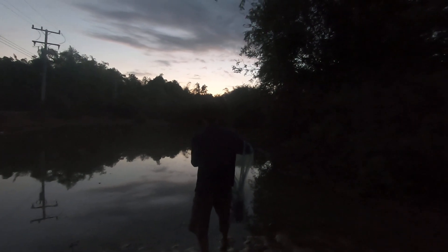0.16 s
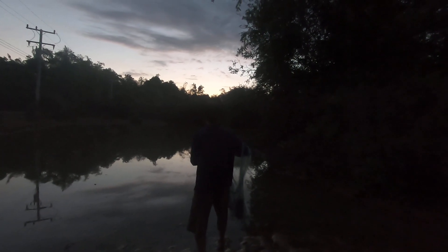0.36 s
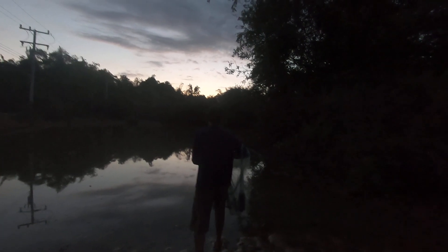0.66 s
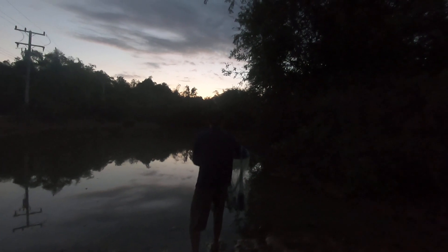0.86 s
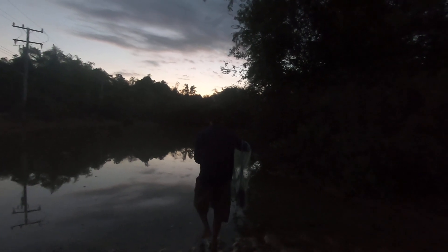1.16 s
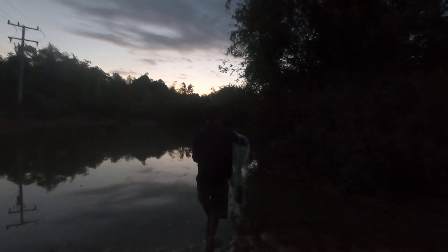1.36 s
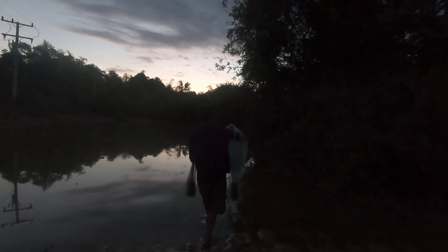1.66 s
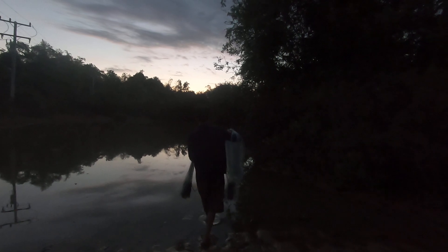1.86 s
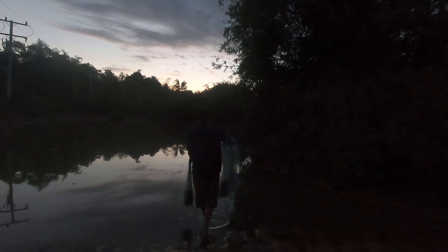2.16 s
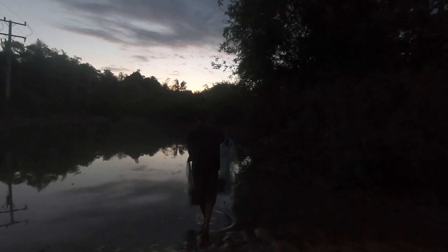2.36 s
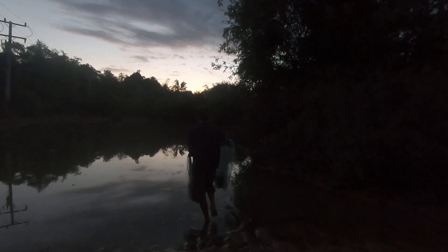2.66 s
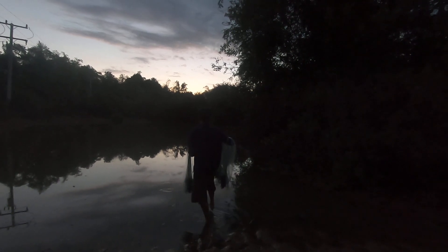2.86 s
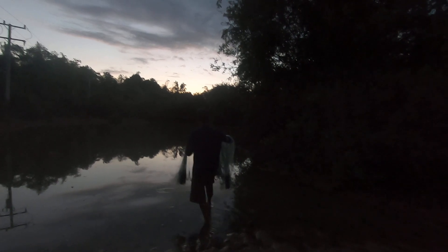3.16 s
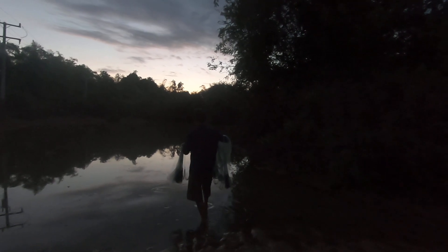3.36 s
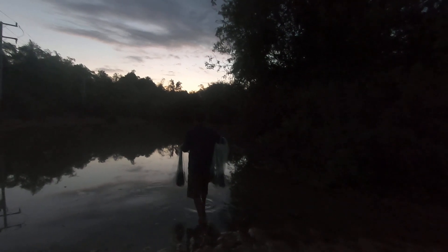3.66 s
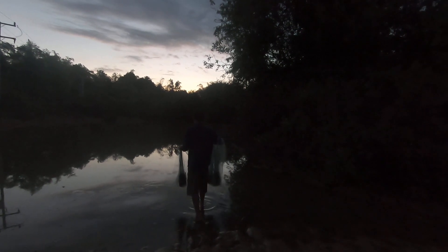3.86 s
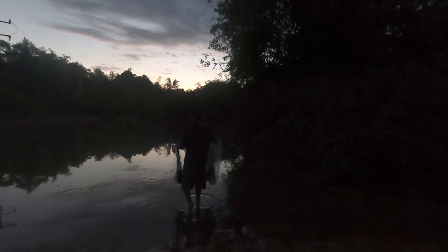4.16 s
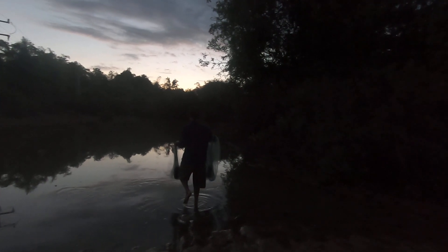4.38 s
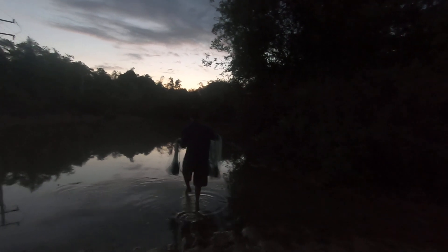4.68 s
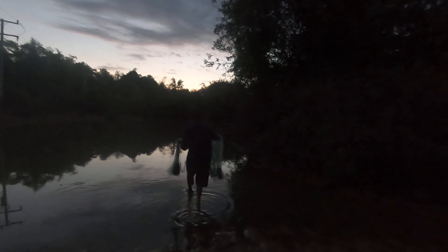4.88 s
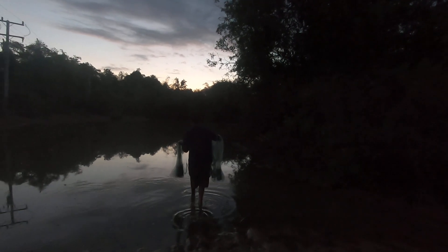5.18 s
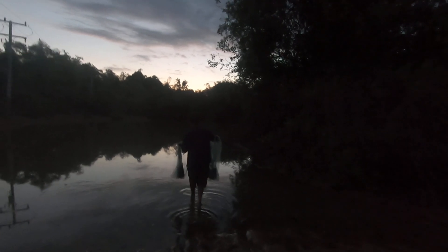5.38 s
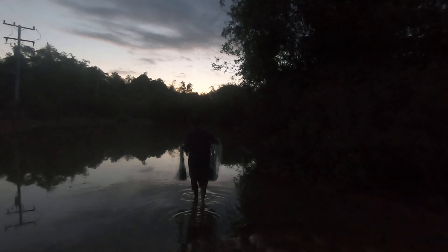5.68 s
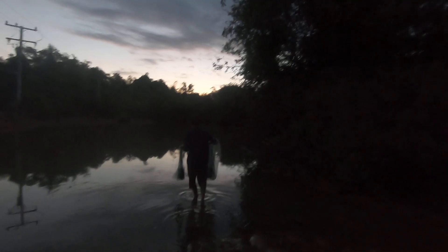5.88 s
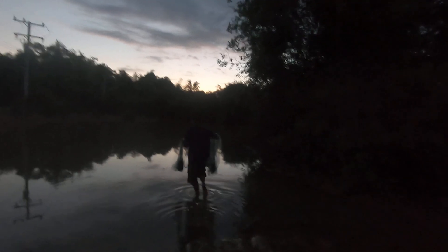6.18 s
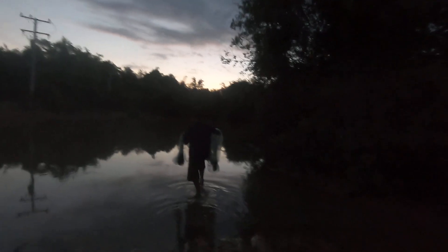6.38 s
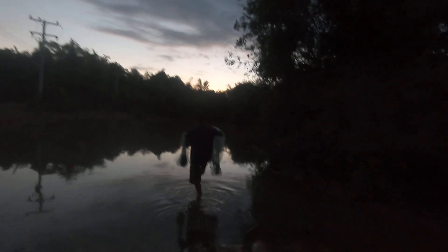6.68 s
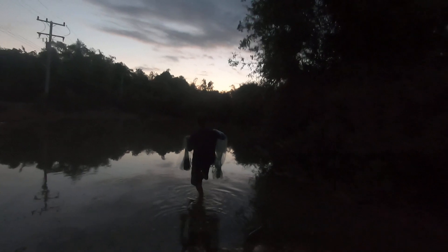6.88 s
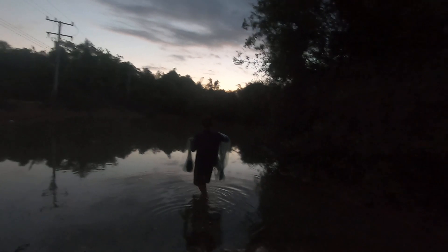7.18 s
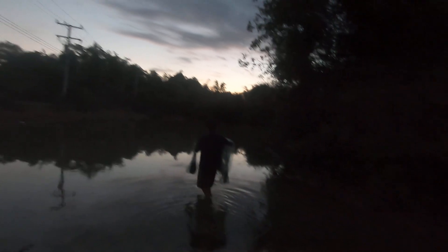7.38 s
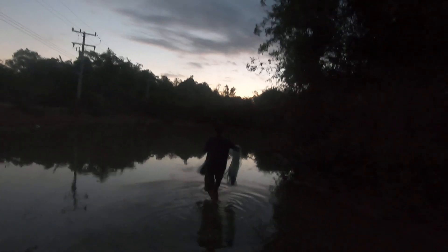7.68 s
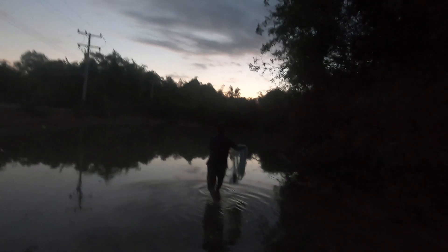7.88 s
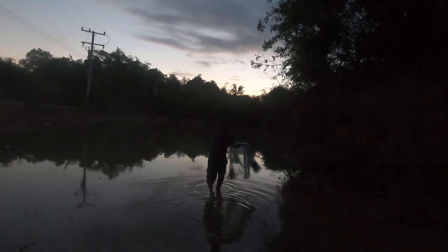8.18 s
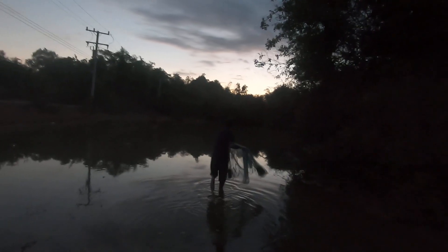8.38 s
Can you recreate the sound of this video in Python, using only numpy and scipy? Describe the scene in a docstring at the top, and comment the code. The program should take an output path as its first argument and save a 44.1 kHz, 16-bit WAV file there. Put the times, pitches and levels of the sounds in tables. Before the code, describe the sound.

Crickets chirp in pulsing triplets over a pond at dusk while someone wades softly, then dull handling knocks and scrapes break in near the end.

```python
"""A pond at dusk: crickets chirp in threes, by stridulation, over a blurred chorus and steady trills.
Wading sloshes and finger scrapes are surges of noise and tiny ringing bubbles; larger bubbles glide
upward in pitch. Drops smack the water, a far bird repeats a note; drone, hiss and air puffs lie beneath.
Fingers on a hand-held camera, mostly late on, excite damped modes of its housing and rub against it."""
import sys
import numpy as np
from scipy import signal
from scipy.fft import rfft, irfft, next_fast_len
from scipy.io import wavfile
from scipy.ndimage import map_coordinates

SR = 44100
rng = np.random.default_rng(int(sys.argv[2]) if len(sys.argv) > 2 else 0)


def wrap_up_sound(samples):
    """Save the sound to the file named by the first command line argument, as 16-bit audio."""
    columns = np.atleast_2d(samples).T
    # keep every value between -1 and 1, then stretch to whole-number steps
    tamed = np.clip(columns, -1, 1)
    steps = np.round(tamed * 32767).astype(np.int16)
    wavfile.write(sys.argv[1], SR, steps)


N = 376594

# Levels are relative: each source's mix gains follow.
# nearest cricket, runs of evenly spaced chirps: (start t/s, chirps)
NEAR_CHIRP_RUNS = [(-.05, 1), (.168, 2), (.647, 2), (1.123, 3), (1.857, 1), (2.075, 3), (2.802, 2),
                   (3.272, 2), (3.741, 1), (3.954, 7), (5.717, 3), (6.452, 3), (7.188, 2), (7.667, 3),
                   (8.399, 1)]
# its rival, runs of evenly spaced chirps: (start t/s, chirps)
RIVAL_CHIRP_RUNS = [(1.956, 3), (2.663, 5), (3.867, 5), (5.154, 3), (5.866, 1), (6.153, 4)]
# a slow, low-pitched cricket, centre of the first syllable of each chirp: (t/s)
SLOW_CHIRP_TIMES = [0.571, 1.26, 2.179, 3.199, 4.352, 4.952, 5.63, 6.599, 7.289, 8.25]
# insect chorus: (t/s, cricket level/dB, bush cricket level/dB)
CHORUS_LEVELS = [(0, -53, -62), (1.1, -51.5, -63), (1.4, -51.5, -65.5), (3.6, -53, -67.5),
                 (5.5, -52, -65.5), (6.7, -53, -64.5), (7.4, -56.5, -63), (8.54, -54.5, -61)]
# tree crickets: (t/s, level/dB)
TRILL_LEVELS = [(0, -70), (1, -70.5), (2, -72), (4.5, -71), (5.8, -71), (6.5, -65.5), (8.54, -67)]
# sloshes of the water and scrapes of fingers on the housing:
# (crest t/s, length t/s, froth and droplet level/dB, spray level/dB)
SLOSHES_AND_SCRAPES = [(0.897, 0.088, -62.5, -74), (2.504, 0.11, -62.5, -71), (3.1, .07, -73, -79),
                       (3.826, 0.047, -66, -85), (4.004, 0.1, -68, -92), (4.297, 0.14, -67, -80),
                       (4.86, .06, -65.5, -94), (6.286, 0.14, -59.5, -69), (6.688, .05, -60, -68),
                       (7.027, 0.06, -52.5, -67), (7.217, 0.019, -55.5, -74), (7.374, 0.012, -44, -50.5),
                       (7.387, 0.062, -60, -89), (7.71, 0.51, -62, -78), (8.044, 0.043, -54.5, -73),
                       (8.223, 0.084, -51, -74.5), (8.365, .045, -53, -73.5), (8.484, 0.097, -66.5, -77)]
# surfacing bubbles, alone or in a string: (start t/s, bubbles, start f/Hz, rise f/Hz, level/dB)
SURFACING_BUBBLES = [(0.117, 1, 800, 600, -46.5), (.19, 7, 603, 1005, -61), (0.71, 1, 1204, 1454, -48.5),
                     (2.326, 1, 506, 1300, -61.5), (2.959, 1, 473, 1200, -61), (3.6, 1, 325, 790, -52.5),
                     (4.115, 1, 1733, 190, -43.5), (4.325, 1, 910, 1420, -54), (4.654, 1, 636, 1660, -57),
                     (4.735, 1, 835, 1710, -49), (4.8, 2, 732, 1130, -63.5), (5.755, 1, 405, 610, -56),
                     (6.168, 1, 973, 250, -44.5), (8.248, 1, 1226, 1000, -50), (8.37, 1, 1260, 400, -48)]
# contacts on the housing: (t/s, thump f/Hz, thump level/dB, knock level/dB, click level/dB)
CONTACTS = [(.866, 260, -80, -59, -39), (4.39, 257, -42, -79, -62.5), (6.405, 237, -32, -34, -41),
            (6.768, 249, -63, -62, -42.5), (6.806, 273, -16.5, -31, -35), (6.987, 263, -43.5, -38, -39.5),
            (7.018, 221, -43, -42, -61), (7.05, 247, -27.5, -38.5, -64), (7.363, 256, -49, -39.5, -41.5),
            (7.376, 210, -34.5, -36, -41), (7.393, 265, -34.5, -47, -49), (7.443, 265, -17.5, -30, -33.5),
            (7.578, 238, -29, -53, -63), (7.615, 230, -25, -46, -65), (7.621, 226, -17.5, -28, -50),
            (7.782, 249, -38.5, -45, -74), (8.033, 250, -27, -30.5, -68), (8.06, 265, -49, -42, -45.5),
            (8.186, 206, -34.5, -50, -45)]
# modes of the housing walls: (f/Hz, level/dB, 60 dB decay t/s)
WALL_MODES = [(687, 8, 0.031), (573, 4, 0.027), (1047, 1.5, 0.021)]
# modes of a hard contact: (f/Hz, level/dB, 60 dB decay t/s)
CLICK_MODES = [(1160, -3, 0.014), (1766, -6.5, 0.028), (2096, -6.5, 0.032), (2636, -6, 0.025),
               (3050, 1, 0.0086)]
# the loudest drops that hit the water: (t/s, ring f/Hz, level/dB)
LOUD_DROPS = [(.955, 2820, -44), (6.222, 3070, -40.5), (6.285, 3100, -35), (6.305, 3110, -34.5),
              (6.342, 2430, -43.5)]
# puffs of air on the microphones: (crest t/s, length t/s, level/dB)
AIR_PUFFS = [(4.14, .1, -63), (5.546, 0.085, -54.5), (6.04, 0.1, -54.5), (6.406, 0.1, -56.5)]
# spectrum of the distant cricket crowd: (f/Hz, level/dB)
CRICKET_SPECTRUM = [(2900, -54), (3400, -16.5), (3720, -7), (4100, 1), (4500, 2.5), (4850, -8.5),
                    (5150, -16.5), (5700, -42)]
# spectrum of the bush crickets: (f/Hz, level/dB)
BUSH_SPECTRUM = [(5500, -45.5), (6600, -20.5), (7100, -2), (7550, 4), (7850, 0.5), (8050, -8.5),
                 (8450, -15.5), (9300, -32.5), (11000, -53.5)]
# spectrum of the low drone: (f/Hz, level/dB)
DRONE_SPECTRUM = [(20, -35), (60, -16.5), (85, -19.5), (115, -14), (140, 1), (160, 5), (205, -3),
                  (255, -11.5), (320, -13.5), (410, -34.5), (600, -24), (1000, -46)]
# spectrum of the faint hiss: (f/Hz, level/dB)
HISS_SPECTRUM = [(100, 10.5), (400, 7), (620, -9), (740, -6.5), (900, -4.5), (1150, 3), (1700, -4),
                 (3200, 5), (6000, 1.5), (9000, -1), (11500, -31), (15000, -45)]
# spectrum of the froth: (f/Hz, level/dB)
FROTH_SPECTRUM = [(200, -18), (600, 5.5), (1300, -11), (2200, 9), (3200, 10.5), (5000, -13.5), (9000, -39)]
# spectrum of the fine spray: (f/Hz, level/dB)
SPRAY_SPECTRUM = [(1500, -7.5), (4000, 0.5), (7000, 10), (9500, 3.5), (13000, -24), (16000, -31.5)]
RUMBLE_SPECTRUM = [(20, -14.5), (45, -6), (70, 5.5), (110, -6.5), (200, -21)]  # (f/Hz, level/dB)
PUFF_SPECTRUM = [(10, -1), (28, -6.5), (48, -8.5), (120, -27.5), (300, -57)]  # (f/Hz, level/dB)
# spectrum of the rubbing fingers: (f/Hz, level/dB)
RUB_SPECTRUM = [(25, -16.5), (70, -10.5), (140, -0.5), (270, 1.5), (400, -18.5), (700, -28.5),
                (1500, -32.5)]

TOP_HZ = 15500
NEAR_BEAT_S, RIVAL_BEAT_S, BEATS_PER_CHIRP = .0428, .0416, 6  # wing beats: three sound, three rest
NEAR_DB, RIVAL_DB, CHIRP_SCATTER_DB = -46.1, -52.3, .5
BIRD_START_S, BIRD_EVERY_S, BIRD_DB = 2.82, .34, -77.5
BUBBLE_CYCLES, BUBBLE_EVERY_S = 28, .082  # length in periods of the start pitch; spacing in a string
STRAY_DRIPS_PER_S, STRAY_HZ, STRAY_DB = 2.5, 2400, -56  # small drops falling from legs and net
# fingers rub around each contact: level, dB per dB of thump, lag, length
RUB_DB, RUB_GROWS, RUB_LAG_S, RUB_S = -41, 0.56, 0.02, 0.073
BREEZE_DB, BREEZE_SWING_DB = -79.5, 9  # light stirrings beneath the puffs


def amp(db):
    """Logarithmic level: decibels to amplitude gain."""
    return 10 ** (np.asarray(db) / 20)


def unit(x):
    """Power normalization: scale to rms 1."""
    return x / np.sqrt(np.mean(x ** 2) + 1e-20)


def curves(rows):
    """Linear interpolation: one value per sample for each column after the time."""
    s, *cols = np.transpose(rows)
    return [np.interp(np.arange(N) / SR, s, c) for c in cols]


def wobble(rate):
    """Band-limited fluctuation: a smooth random curve, rate knots a second."""
    coarse = np.arange(0, N + 16, 16)
    knots = rng.standard_normal(int(N * rate / SR) + 4)
    smooth = map_coordinates(knots, [coarse * rate / SR])
    return np.interp(np.arange(N), coarse, smooth)


def swell(s, length):
    """Gaussian envelope: a bell-shaped surge that crests at time s."""
    return np.exp(-2 * np.minimum(((np.arange(N) / SR - s) / length) ** 2, 20))


def filtered(x, response):
    """Linear filtering: multiply the spectrum of x by a complex response of frequency."""
    size = next_fast_len(N + SR // 4)
    spectrum = rfft(x, size) * response(np.fft.rfftfreq(size, 1 / SR))
    return irfft(spectrum, size)[..., :N]


def colour(x, spectrum):
    """Spectral shaping by (f/Hz, level/dB) points; the result has rms 1."""
    f, db = np.transpose(spectrum)
    return unit(filtered(x, lambda hz: amp(np.interp(np.log(hz + 1), np.log(f), db, right=-120))))


def add(track, s, sound):
    """Superposition: mix a sound into the track from time s."""
    at = round(s * SR) + np.arange(len(sound))
    inside = (at >= 0) & (at < N)
    track[at[inside]] += sound[inside]


def tone(hz):
    """Phase as the integral of frequency: a sine of rms 1 that follows a pitch curve."""
    return np.sqrt(2) * np.sin(2 * np.pi * (np.cumsum(hz) / SR + rng.random()))


def narrow(centre_hz, width_hz):
    """Multipath fading: a tone of rms 1 whose amplitude and phase vary at random."""
    phase = 2 * np.pi * centre_hz * np.arange(N) / SR
    return unit(wobble(width_hz) * np.cos(phase) + wobble(width_hz) * np.sin(phase))


def place(x, pan_db, lag_ms):
    """Level and arrival differences between the ports; positive is to the left."""
    side = np.array([[.5], [-.5]])
    return amp(side * pan_db) * filtered(x, lambda hz: np.exp(2j * np.pi * side * hz * lag_ms / 1000))


def foliage(x, wet_db, t60):
    """Diffuse scattering from the bank and trees: convolution with decaying stereo noise."""
    t = np.arange(SR // 2) / SR
    tail = rng.standard_normal((2, len(t))) * amp(-60 * t / t60)
    tail = tail / np.linalg.norm(tail[0])
    return amp(wet_db) * signal.fftconvolve(x[None], tail, axes=1)[:, :N]


def chirp_times(runs, beat_s, db):
    """Periodicity: within a run the chirps keep to the wing beat; rows of (t/s, level/dB)."""
    return [(s + k * BEATS_PER_CHIRP * beat_s, db + CHIRP_SCATTER_DB * rng.normal())
            for s, count in runs for k in range(count)]


def chirps(rows, pitch_hz, fall_hz, length, spacing, rasp, count):
    """Stridulation: each stroke swells and falls in pitch as the scraper slows along the file."""
    track, u = np.zeros(N), np.linspace(-1, 1, int(length * SR))
    stroke = np.cos(np.pi * u / 2) ** 2
    for s, db in rows:
        for k in range(count):
            pitch = pitch_hz * (1 + 0.0057 * rng.normal()) - fall_hz / 2 * (u + 0.32 * u ** 2)
            level = amp(db + 0.33 * rng.normal())
            add(track, s + k * spacing - length / 2, level * stroke * tone(pitch))
    return track * amp(rasp * wobble(400))  # rasp is in dB


def field_crickets():
    """Unequal periods: two crickets on the right chirp in threes, drifting in and out of step."""
    near = chirps(chirp_times(NEAR_CHIRP_RUNS, NEAR_BEAT_S, NEAR_DB), pitch_hz=4370, fall_hz=780,
                  length=.032, spacing=NEAR_BEAT_S, rasp=1.5, count=3)
    rival = chirps(chirp_times(RIVAL_CHIRP_RUNS, RIVAL_BEAT_S, RIVAL_DB), pitch_hz=4450, fall_hz=880,
                   length=.024, spacing=RIVAL_BEAT_S, rasp=1.2, count=3)
    direct = place(near, pan_db=-5, lag_ms=-.024) + place(rival, pan_db=-3, lag_ms=-.02)
    return amp(-1.8) * direct + foliage(near + rival, wet_db=-11, t60=.2)


def regular_rows(period, jitter_s, db):
    """Jittered periodicity: evenly repeated (t/s, level/dB) rows with small timing errors."""
    starts = (np.arange(int(N / SR / period) + 2) - rng.random()) * period
    return [(s + jitter_s * rng.normal(), db) for s in starts]


def far_crickets():
    """Incoherent summation: distance blurs a crowd to noise; quick, high and slow chirps stand out."""
    quick = chirps(regular_rows(.27, .017, -58), pitch_hz=3889, fall_hz=756,
                   length=.018, spacing=.024, rasp=1.5, count=6)
    high = chirps(regular_rows(.21, .018, -61), pitch_hz=4780, fall_hz=655,
                  length=.038, spacing=.042, rasp=.91, count=4)
    slow = chirps([(s, -69.5) for s in SLOW_CHIRP_TIMES], pitch_hz=2882, fall_hz=287,
                  length=.065, spacing=.087, rasp=.68, count=3)
    slow = slow * narrow(0, 130)
    crowd = amp(curves(CHORUS_LEVELS)[0] - 5.5 + 1.2 * wobble(30))
    blur = colour(rng.standard_normal((3, N)), CRICKET_SPECTRUM) * crowd
    direct = place(quick + high + blur[0], pan_db=-2.5, lag_ms=-.015) + place(slow, pan_db=6, lag_ms=0)
    return direct + amp(-15) * blur[1:] + foliage(quick + high, wet_db=-5.5, t60=.12)


def tree_crickets():
    """Beating: close narrow-band voices make a far, unbroken whistle that flutters, with its octave."""
    level = amp(curves(TRILL_LEVELS)[0])
    voices = narrow(2722, 32) + amp(-5) * narrow(2715, 90) + amp(-8) * tone(2724 + 6 * wobble(6))
    whistle = unit(voices)
    octave = amp(-8.5) * narrow(5422, 42)
    return place(level * whistle, pan_db=4, lag_ms=-.011) + place(level * octave, pan_db=-6, lag_ms=.033)


def bush_crickets():
    """Amplitude modulation: rapid wing clicks make a high sizzle that swells several times a second."""
    strokes = np.cumsum(108 + 1.2 * wobble(8)) / SR
    clicks = unit(np.diff(np.floor(strokes), prepend=0))
    # leaves spread each click over a few milliseconds
    spread = unit(foliage(clicks, wet_db=0, t60=.03)[0])
    rasp = unit(amp(2.9 * tone(205 + 12 * wobble(30))) * rng.standard_normal(N))
    near = colour(amp(1.5) * spread + rasp, BUSH_SPECTRUM)
    far = colour(rng.standard_normal((2, N)), BUSH_SPECTRUM)
    throb = .8 * tone(6.3 + .7 * wobble(3))
    level = amp(curves(CHORUS_LEVELS)[1] + 2.5 + throb)
    return level * (place(near, pan_db=-10, lag_ms=-.057) + amp(-2) * far)


def evening_air():
    """Filtered noise: a distant drone, uneven rumble, faint hiss and slow puffs of air at the ports."""
    low = colour(rng.standard_normal((2, N)), DRONE_SPECTRUM)
    width = filtered(low[1], lambda hz: np.minimum(hz / 350, 1))  # ports differ more as pitch rises
    drone = amp(-66 + 0.26 * wobble(1.6)) * (low[0] + np.array([width, -width]))
    rumble = amp(-75 + 4.2 * wobble(14)) * colour(rng.standard_normal(N), RUMBLE_SPECTRUM)
    hiss = amp(-69 + 0.27 * wobble(19)) * colour(rng.standard_normal((2, N)), HISS_SPECTRUM)
    gusts = sum(amp(db) * swell(s, length) for s, length, db in AIR_PUFFS)
    breeze = amp(BREEZE_DB + BREEZE_SWING_DB * wobble(8.5))
    puffs = (gusts + breeze) * colour(rng.standard_normal((2, N)), PUFF_SPECTRUM)
    return drone + rumble + hiss + puffs * amp([[-6], [4]])


def droplets(rate, pitch_hz, cycles, scatter_db):
    """Bubble resonance: dense tiny bubbles, each a short rising ring; the sum has rms 1."""
    draws = np.clip(rng.standard_normal((int(rate * N / SR), 2)), -2, 2)
    t = np.arange(SR // 80) / SR
    hz = pitch_hz * np.exp(draws[:, :1] / 3)
    age = hz * t / cycles
    rise = 1 + 0.037 * np.minimum(age, 5)
    rings = amp(scatter_db * draws[:, 1:]) * np.exp(-age) * np.sin(2 * np.pi * hz * t * rise)
    at = rng.integers(0, N, len(draws))[:, None] + np.arange(len(t))
    return unit(np.bincount(at.ravel(), rings.ravel(), N)[:N])


def sloshes_and_scrapes():
    """Modulated noise: each slosh or scrape is a surge of droplets, froth and a little fine spray."""
    body = sum(amp(db) * swell(s, length) for s, length, db, _ in SLOSHES_AND_SCRAPES)
    spray = sum(amp(db) * swell(s, length) for s, length, _, db in SLOSHES_AND_SCRAPES)
    froth = colour(rng.standard_normal(N) * amp(4.5 * wobble(250)), FROTH_SPECTRUM)
    drops = droplets(rate=700, pitch_hz=1900, cycles=3, scatter_db=7)
    mist = colour(rng.standard_normal(N) * amp(6 * wobble(300)), SPRAY_SPECTRUM)
    clumps = amp(2.5 * wobble(110) - .7)
    ripples = amp(-93 + 4.6 * wobble(7)) * drops
    surges = body * (amp(-14) * froth + amp(-9) * drops) + spray * mist
    mix = clumps * surges + ripples
    return place(mix, pan_db=-9.5, lag_ms=-.027) + foliage(mix, wet_db=-2, t60=.081)


def bubbles():
    """Bubble resonance: pitch climbs as the water above thins; big, low bubbles last longer."""
    track = np.zeros(N)
    for s, count, start_hz, rise_hz, db in SURFACING_BUBBLES:
        u = np.linspace(0, 1, int(BUBBLE_CYCLES / start_hz * SR))
        envelope = np.abs(np.sin(np.pi * u)) ** 0.25
        for k in range(count):
            end_hz = start_hz + rise_hz * np.exp(.12 * rng.normal())
            pitch = 1 / ((1 - u) / start_hz + u / end_hz)  # the period changes linearly
            add(track, s + k * BUBBLE_EVERY_S, amp(db) * envelope * tone(pitch))
    flutter = 3.5 * wobble(300)
    track = track * amp(-16.5 + flutter)
    return place(track, pan_db=-3.5, lag_ms=-.02) + foliage(track, wet_db=-6, t60=.14)


def drips():
    """Impact and ringing: a drop smacks the surface, smaller ones follow; stray drops fall at random."""
    track, t = np.zeros(N), np.arange(SR // 50) / SR
    strays = [(rng.uniform(0, N / SR), STRAY_HZ * np.exp(.2 * rng.normal()), STRAY_DB + 3 * rng.normal())
              for _ in range(int(STRAY_DRIPS_PER_S * N / SR))]
    envelope = (1 - np.exp(-t / 0.00021)) * amp(-60 * t / 0.0076)
    for s, hz, db in LOUD_DROPS + strays:
        for k in range(3):
            pitch = hz * np.exp(0.15 * k * rng.normal())
            ping = envelope * np.sin(2 * np.pi * pitch * t * (1 + 8 * t))
            add(track, s + k * rng.uniform(.002, .0061), amp(db - 2.6 * k) * ping)
    return place(track, pan_db=-1.5, lag_ms=-.02) + foliage(track, wet_db=-3, t60=.17)


def ring(modes, attack):
    """Modal superposition: damped modes after one blow, peak 1."""
    t, sound = np.arange(SR // 8) / SR, 0
    for hz, db, t60 in modes:
        decay = amp(db + rng.normal() - 60 * t / t60)
        sound = sound + decay * np.sin(2 * np.pi * hz * (1 + 0.059 * rng.normal()) * t)
    sound = sound * (1 - np.exp(-(t / attack) ** 2))
    return sound / np.abs(sound).max()


def handling():
    """Impact and friction: contacts click near the right port, the gripped housing thumps, fingers rub."""
    thumps, walls, clicks, rub_power = np.zeros((4, N))
    t = np.arange(SR // 4) / SR
    envelope = amp(-60 * t / 0.03) * (1 - np.exp(-(t / 0.0063) ** 2))
    for s, thump_hz, thump_db, knock_db, click_db in CONTACTS:
        thump = envelope * np.sin(2 * np.pi * thump_hz * t)  # the grip sets the pitch
        add(thumps, s, amp(thump_db) * thump / np.abs(thump).max())
        add(walls, s, amp(knock_db - 3.5) * ring(WALL_MODES, attack=0.00089))
        add(clicks, s, amp(click_db + 0.5) * ring(CLICK_MODES, attack=0.0008))
        rub_power += (amp(RUB_DB + RUB_GROWS * thump_db) * swell(s + RUB_LAG_S, RUB_S)) ** 2
    rub = colour(rng.standard_normal(N), RUB_SPECTRUM) * np.sqrt(rub_power) * amp(1.9 * wobble(25))
    direct = place(thumps, pan_db=0, lag_ms=.071) + place(walls, pan_db=-4.5, lag_ms=.071)
    direct = direct + place(clicks, pan_db=-12, lag_ms=0)
    return direct + foliage(thumps + walls + clicks, wet_db=-20, t60=.28) + rub


def far_bird(count=5):
    """Scattered propagation: soft, wavering arched notes from across the pond."""
    track, u = np.zeros(N), np.linspace(0, 1, int(.1 * SR))
    arch = np.sin(np.pi * u)
    for k in range(count):
        pitch = (1280 + 130 * arch) * (1 + 0.026 * rng.normal())
        add(track, BIRD_START_S + k * BIRD_EVERY_S, arch * tone(pitch))
    return foliage(track * narrow(0, 120), wet_db=BIRD_DB, t60=.074)


def scene():
    """Superposition of the insects, air, water, camera contacts and bird."""
    insects = field_crickets() + far_crickets() + tree_crickets() + bush_crickets()
    water_and_scrapes = sloshes_and_scrapes() + bubbles() + drips()
    return insects + evening_air() + water_and_scrapes + handling() + far_bird()


def record(dry):
    """Band limitation: the camera keeps nothing above its upper limit."""
    return filtered(dry, lambda hz: hz < TOP_HZ)


dry = scene()
out = record(dry)
wrap_up_sound(out)
```